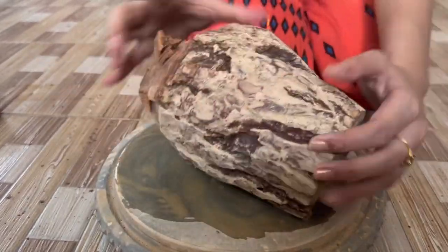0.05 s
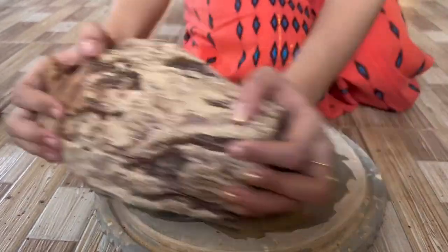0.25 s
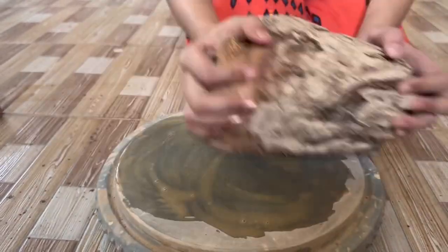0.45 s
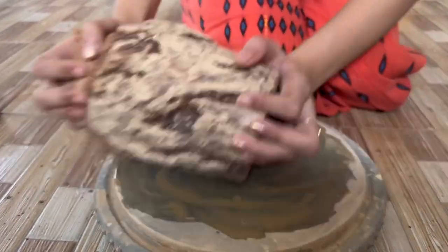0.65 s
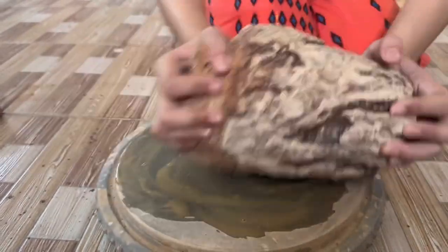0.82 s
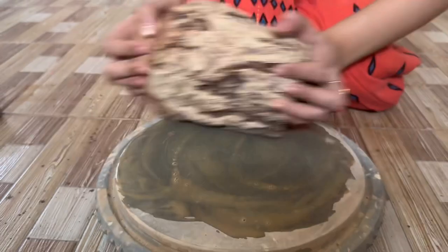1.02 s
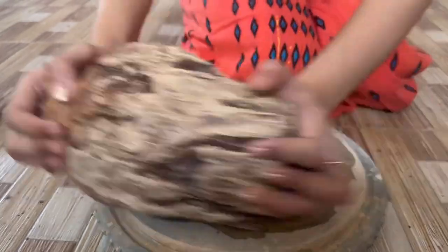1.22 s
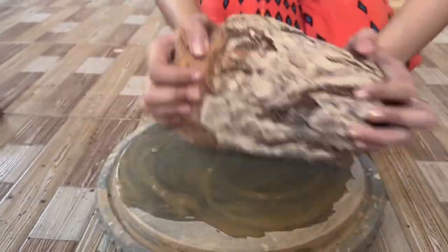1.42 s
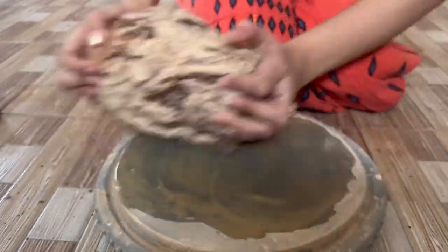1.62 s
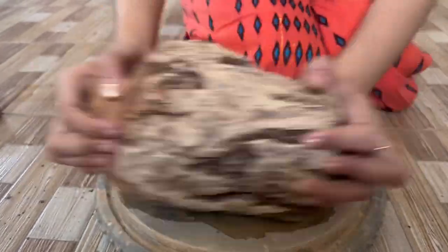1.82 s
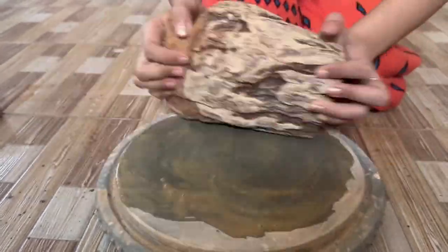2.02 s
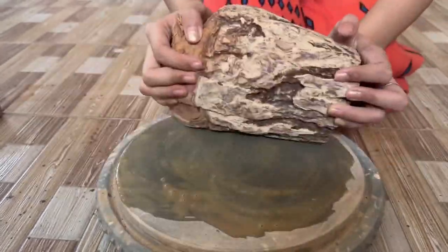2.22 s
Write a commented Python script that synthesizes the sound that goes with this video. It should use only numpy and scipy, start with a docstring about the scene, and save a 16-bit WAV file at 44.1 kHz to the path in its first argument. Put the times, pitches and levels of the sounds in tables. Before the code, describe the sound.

A bark-covered log scrapes on a wet stone slab in rough, uneven strokes, thudding softly.

```python
"""A faint tick and two dull thumps, then the gritty rasp of a bark-covered log ground in circles on a
wet stone slab. Grit crushes in dense tiny slips that ring the wood, rasp in the bark and hiss in the
wet paste. The log rocks, and each bump excites the slab's damped modes. Crumbs snap and hands shift
their grip with soft thumps, over the low rumble of a hard-floored room."""
import sys
import numpy as np
from scipy import signal
from scipy.io import wavfile

SR = 44100
rng = np.random.default_rng(int(sys.argv[2]) if len(sys.argv) > 2 else 0)


def dump(signal):
    """Clip the signal to [-1, 1] and save it as 16-bit WAV at the path in sys.argv[1]."""
    limited = np.clip(np.atleast_2d(signal).T, -1, 1)
    pcm = np.round(limited * 32767).astype(np.int16)
    wavfile.write(sys.argv[1], SR, pcm)


N = 103635
TIME = np.arange(N) / SR
CUTOFF_HZ = 15750
COLOUR_DRIFT_PER_S = 13.5

# Strength of the strokes. Each row: time in seconds, then relative levels in dB of bark rasp,
# wood body and wet hiss.
STROKES = [(0.131, -69, -69, -71), (0.2, -60, -69, -68.5), (0.22, -45.5, -49.5, -54),
           (0.253, -52.5, -44, -55.5), (0.297, -46.5, -46, -49), (0.35, -43, -46.5, -51.5),
           (0.385, -42.5, -41.5, -50.5), (0.473, -38, -45.5, -43.5), (0.527, -43.5, -39, -46.5),
           (0.613, -47.5, -45, -54), (0.699, -39.5, -38.5, -47.5), (0.74, -41, -44.5, -51),
           (0.801, -41.5, -47, -49.5), (0.86, -40, -38, -45.5), (0.925, -45, -45.5, -50.5),
           (0.993, -37, -41, -46), (1.07, -45.5, -49, -51), (1.087, -38.5, -43, -45),
           (1.167, -41, -39, -46), (1.237, -45.5, -43.5, -51.5), (1.26, -47.5, -38, -50),
           (1.323, -43.5, -47.5, -50.5), (1.361, -40, -40.5, -48), (1.396, -45, -49.5, -53.5),
           (1.45, -36.5, -39, -40), (1.51, -42.5, -39.5, -46), (1.543, -44, -45, -51.5),
           (1.7, -40, -45.5, -50), (1.791, -39.5, -40.5, -41.5), (1.855, -44, -43.5, -51),
           (1.95, -41.5, -42.5, -49.5), (2.043, -44, -45, -53.5), (2.095, -52, -54, -58.5),
           (2.126, -70, -61, -81)]
# The log's hollow low range. Each row: time in seconds, relative level in dB.
HOLLOW_SWELL = [(0.2, -54), (0.215, -54), (0.37, -49.5), (0.44, -52.5), (0.5, -48.5), (0.6, -54),
                (0.71, -50), (0.76, -55), (0.99, -50), (1.065, -56), (1.1, -49), (1.4, -51), (1.445, -42),
                (1.485, -44.5), (1.525, -57), (1.79, -45.5), (2.03, -53.5), (2.1, -48), (2.122, -68)]
# Centre of the bark's rasp. Each row: time in seconds, frequency in Hz.
RASP_CENTRE = [(0.22, 2240), (0.32, 2740), (0.38, 2300), (0.48, 2450), (0.55, 3800), (0.61, 3430),
               (0.67, 2740), (0.76, 2380), (0.92, 2550), (1.0, 3200), (1.08, 2230), (1.29, 2580),
               (1.45, 2260), (1.57, 2120), (1.62, 2900), (1.73, 2240), (1.95, 2710), (2.05, 2260)]
# Centre of the wood's growl. Each row: time in seconds, frequency in Hz.
BODY_CENTRE = [(0.32, 1285), (0.39, 986), (0.53, 1220), (0.71, 1270), (0.76, 970), (0.85, 1150),
               (0.97, 1350), (1.05, 1080), (1.14, 1700), (1.19, 1080), (1.26, 1300), (1.46, 1200),
               (1.51, 1000), (1.6, 1300), (1.82, 1000), (1.9, 1340)]
# Spectrum of the grinding. Each row: frequency in Hz, relative spectral density in dB.
GRIT_SPECTRUM = [(500, -9.5), (570, -3), (760, -6), (950, -2), (1200, -5), (1550, -0.5), (1800, -7),
                 (2400, -4), (3200, -7.5), (3800, -7), (4500, -16.5), (7000, -19), (10400, -23.5),
                 (11500, -28), (14500, -25.5), (15500, -29)]
# Lean to the left. Each row: frequency in Hz, left minus right level in dB.
LEFT_LEAN = [(950, 1.9), (2500, 1.0), (5000, 3.5), (12000, 0)]


def grinding():
    """Friction noise: four ranges swell with the strokes and shift in colour as the contact moves."""
    times, *levels_db = np.transpose(STROKES)
    rasp, body, hiss = [envelope(np.c_[times, db]) for db in levels_db]
    rasp_hz, body_hz = [np.interp(TIME, *np.transpose(curve)) for curve in (RASP_CENTRE, BODY_CENTRE)]
    grains, out = [grit(), grit()], 0
    for low_hz, high_hz, swell, range_db in ((491.6, 811, envelope(HOLLOW_SWELL), 2),
                                             (811, 1836, body, 3),
                                             (1836, 4100, rasp, 3.5),
                                             (4100, CUTOFF_HZ, hiss, 2)):
        edges = np.geomspace(low_hz, high_hz, 9)
        layer, power = 0, 0
        for k, (low, high) in enumerate(zip(edges, edges[1:])):
            hz = np.sqrt(low * high)
            rasp_lift = formant(hz, rasp_hz, lift_db=7, half_width_octaves=0.21)
            body_lift = formant(hz, body_hz, lift_db=7.5, half_width_octaves=0.15)
            wander_db = 2 * drift(COLOUR_DRIFT_PER_S)
            gain = from_db(at_hz(GRIT_SPECTRUM, hz) + rasp_lift + body_lift + wander_db)
            pan = from_db(at_hz(LEFT_LEAN, hz) * np.array([[.5], [-.5]]))
            layer = layer + gain * pan * band(grains[k % 2], low, high)
            power = power + gain ** 2 * (high - low)
        steady = rms_one(layer / np.sqrt(power))   # shifts of colour keep the level
        out = out + from_db(range_db) * swell * steady
    return out + floor_drone(body)


# Resonances of log and slab. Each row: frequency in Hz, bandwidth in Hz, lift in dB.
CONTACT_RESONANCES = [(545, 90, 0.5), (928, 55, 3.5), (1200, 34, 5.5)]


def slips(per_s=5000, spread_db=4):
    """Stick-slip: grains give way at random, many small and a few large, and excite the resonances."""
    sizes = from_db(spread_db * np.minimum(rng.exponential(1, N), 5))
    signs = rng.choice([-1, 1], N)
    slipping = rng.random(N) < per_s / SR
    pressure_flutter = from_db(0.5 * drift(per_s=30))
    clicks = sizes * signs * slipping * pressure_flutter
    for hz, width, lift_db in CONTACT_RESONANCES:
        clicks = clicks + (from_db(lift_db) - 1) * resonate(clicks, hz, width)
    return clicks


def grit():
    """Incoherent sources: slips in the room add to scattered ones that are unlike at each ear."""
    return room(slips()) + np.array([slips(), slips()])


# The drone of the room's floor under the grinding. Each row: frequency in Hz, bandwidth in Hz, level in dB
# relative to the load.
DRONE_MODES = [(133, 7.3, -17.5), (217.3, 10.4, -26), (322, 510, -19.5)]


def floor_drone(body):
    """Forced vibration: random shaking drives resonances of the room's floor, under a load that follows the
    wood's swell."""
    load = np.sqrt(body * body.mean())
    out = 0
    for hz, width, db in DRONE_MODES:
        shake = rng.standard_normal(N) + rng.standard_normal((2, N))
        out = out + from_db(db) * load * rms_one(resonate(shake, hz, width))
    return out


# The rocking log strikes the slab. Each row: start in seconds, then relative levels in dB of
# slab thud, log knock and grit crunch.
IMPACTS = [(0.266, -41, -53, -44), (0.428, -40.5, -63, -45), (0.595, -54, -50.5, -41),
           (0.62, -46, -49.5, -47), (0.913, -40, -60, -62), (1.079, -38, -47.5, -43),
           (1.244, -47.5, -48, -36.5), (1.353, -48, -52.5, -58), (1.403, -39.5, -46, -37.5),
           (1.443, -60, -57.5, -34.5), (1.558, -63, -54.5, -35.5), (1.715, -36.5, -55.5, -37.5),
           (1.888, -43, -65, -55), (2.03, -47.5, -77, -38.5)]
# The struck slab's modes. Each row: frequency in Hz, gain in dB, time to fall 60 dB in seconds.
THUD_MODES = [(103.5, -22, .19), (126.4, -3.5, 0.18)]


def bumps(contact_s=0.00093, knock_decay_s=0.018, crunch_decay_s=0.011):
    """Impact excitation: each bump rings the slab's modes, shudders the log and crushes some grit."""
    starts, thud_db, _, _ = np.transpose(IMPACTS)
    clicks = np.zeros(N)
    clicks[(starts * SR).astype(int)] = from_db(thud_db)
    ringing = sum(from_db(db) * ring(clicks, hz, t60) for hz, db, t60 in THUD_MODES)
    pole = np.exp(-2 * np.pi / (contact_s * SR))
    thud = signal.lfilter([1 - pole], [1, -pole], ringing)   # a soft contact acts as a low-pass
    shudder = sum(from_db(db) * burst(start, knock_decay_s) for start, _, db, _ in IMPACTS)
    knock = shudder * rms_one(resonate(slips(), hz=217, width_hz=68))
    crush = sum(from_db(db) * burst(start, crunch_decay_s) for start, _, _, db in IMPACTS)
    crunch = crush * rms_one(band(slips(), low_hz=380, high_hz=2900))
    return thud + from_db(-11) * room(thud) + room(knock + crunch)


# Crumbs and edges of bark catch and snap; the row at 0.826 s is instead a hollow knock of the log. Each row:
# start in seconds, # relative ring level in dB, frequency in Hz, decay time in seconds, relative snap level in
# dB.
CRUMB_SNAPS = [(0.084, -48, 940, 0.0022, -59.5), (0.179, -47, 2470, 0.0027, -42),
               (0.826, -36, 626, 0.01, -60), (2.14, -41.5, 1930, 0.0014, -57),
               (2.2, -51, 2410, 0.0034, -59), (2.279, -61, 1070, 0.004, -62)]


def crumbs():
    """Brittle fracture: each snap gives a broadband burst and a brief woody ring."""
    out = 0
    for start, ring_db, hz, decay_s, snap_db in CRUMB_SNAPS:
        tone = np.sin(2 * np.pi * hz * (TIME - start))
        snap = band(rng.standard_normal(N), low_hz=600, high_hz=9300)
        out = out + burst(start, decay_s) * (from_db(ring_db) * tone + from_db(snap_db) * snap)
    return .5 * (out + room(out))


# Hands shift their grip. Each row: start in seconds, level in dB, frequency in Hz.
GRIP_SHIFTS = [(0.124, -48.5, 52.6), (0.165, -41, 68), (2.021, -42.5, 54.3), (2.264, -48.5, 38.8)]


def pushes():
    """Damped oscillation: each push of the hands sends one low thump through the floor."""
    out = 0
    for start, db, hz in GRIP_SHIFTS:
        impulse = signal.unit_impulse(N, int(start * SR))
        out = out + from_db(db) * ring(impulse, hz, t60_s=0.21)
    return out


# Room and handling noise. Each row: frequency in Hz, relative spectral density in dB.
RUMBLE_SPECTRUM = [(25, -14), (64, -3.5), (90, -13), (118, 1), (167, -15), (219, -15), (344, -15),
                   (450, -21.5), (2100, -35.5), (12400, -53.5), (15000, -60)]
# Likeness of the rumble at the two ears. Each row: frequency in Hz, correlation (1 is identical).
RUMBLE_COHERENCE = [(70, 1), (180, 0.29)]


def rumble(level_db=-55):
    """Interaural coherence: lumpy noise is alike at both ears in the bass, less so in its faint hiss."""
    out, edges = 0, 22 * 2 ** np.arange(0, 10, .5)   # half-octave bands
    white = rng.standard_normal((2, 2, N))
    for k, (low, high) in enumerate(zip(edges, edges[1:])):
        mid, side = band(white[k % 2], low, high)
        hz = np.sqrt(low * high)
        alike = np.clip(at_hz(RUMBLE_COHERENCE, hz), -1, 1)
        gain = from_db(at_hz(RUMBLE_SPECTRUM, hz) + 1.2 * drift(COLOUR_DRIFT_PER_S))
        out = out + gain * (np.sqrt(1 + alike) * mid + np.sqrt(1 - alike) * side * [[1], [-1]])
    return from_db(level_db) * rms_one(out)


def room(x, t60_s=0.14, direct_db=-5, reflected_db=3.5):
    """Reverberation: direct sound plus dense decaying reflections, different at each ear."""
    t = TIME[:SR // 2]
    tails = rng.standard_normal((2, len(t))) * np.exp(-np.log(1000) * t / t60_s)
    tails /= np.sqrt(np.sum(tails ** 2, axis=1, keepdims=True))
    reflections = signal.fftconvolve(x[None], tails, axes=1)[:, :N]
    return from_db(direct_db) * x + from_db(reflected_db) * reflections


def formant(hz, centre_hz, lift_db, half_width_octaves):
    """A spectral peak in dB, Gaussian in log frequency."""
    return lift_db * np.exp(-(np.log2(hz / centre_hz) / half_width_octaves) ** 2)


def envelope(curve):
    """Amplitude envelope from rows of seconds and dB; silent outside them."""
    times, db = np.transpose(curve)
    return from_db(np.interp(TIME, times, db, left=-np.inf, right=-np.inf))


def burst(start, decay_s):
    """Exponential decay from a sudden onset."""
    return (TIME >= start) * np.exp(-np.abs(TIME - start) / decay_s)


def drift(per_s):
    """Random modulation: low-passed noise of unit RMS."""
    r = np.exp(-40 * np.pi * per_s / SR)
    white = rng.standard_normal(N // 20 + 2002)   # one value per 20 samples
    slow = signal.lfilter([1], [1, -2 * r, r * r], white)[2000:]
    return np.interp(np.arange(N) / 20, np.arange(len(slow)), rms_one(slow))


def band(x, low_hz, high_hz):
    """Second-order band-pass."""
    sos = signal.butter(2, [low_hz, min(high_hz, .49 * SR)], "band", fs=SR, output="sos")
    return signal.sosfilt(sos, x + 1e-18)


def resonate(x, hz, width_hz):
    """Two-pole resonance with unit peak gain."""
    r, w = np.exp(-np.pi * width_hz / SR), 2 * np.pi * hz / SR
    feedforward = np.array([1, 0, -1]) * (1 - r * r) / 2
    return signal.lfilter(feedforward, [1, -2 * r * np.cos(w), r * r], x + 1e-18)


def ring(x, hz, t60_s):
    """Free vibration: a unit impulse starts a decaying sine of height 1."""
    r, w = np.exp(-np.log(1000) / (t60_s * SR)), 2 * np.pi * hz / SR
    return signal.lfilter([0, np.sin(w)], [1, -2 * r * np.cos(w), r * r], x + 1e-18)


def at_hz(points, hz):
    """Interpolation on a log-frequency axis."""
    frequencies, values = np.transpose(points)
    return np.interp(np.log(hz), np.log(frequencies), values)


def from_db(db):
    """Decibels to amplitude ratio."""
    return 10 ** (np.asarray(db) / 20)


def rms_one(x):
    """Normalisation to unit RMS."""
    return x / np.sqrt(np.mean(x ** 2) + 1e-20)


def scene():
    """Superposition: the pressures of all sources add at each ear."""
    return grinding() + bumps() + crumbs() + pushes() + rumble()


def record(dry):
    """Band limiting: a steep low-pass removes the highest treble."""
    return signal.sosfilt(signal.ellip(12, .1, 80, CUTOFF_HZ, fs=SR, output="sos"), dry)


dry = scene()
out = record(dry)
dump(out)
```